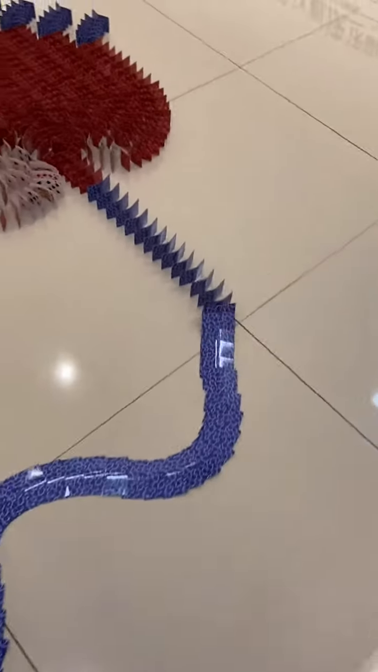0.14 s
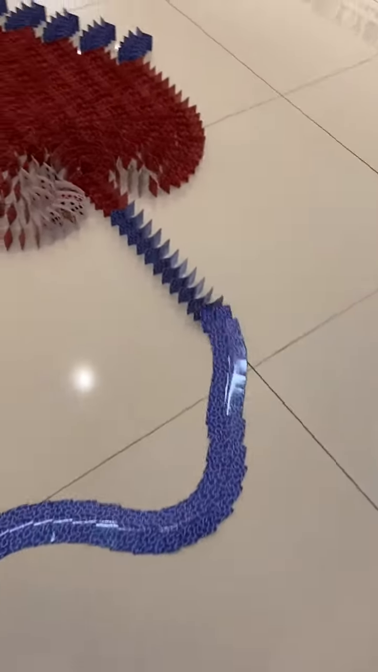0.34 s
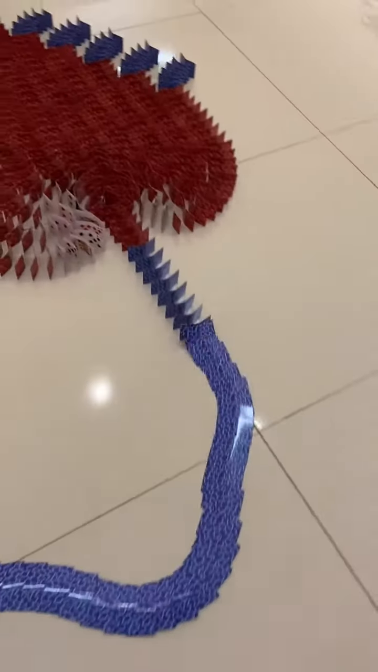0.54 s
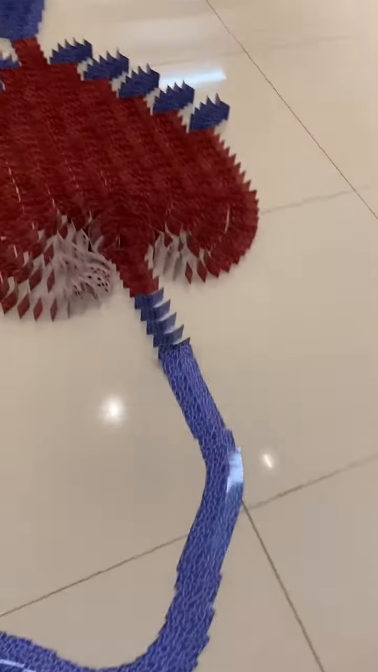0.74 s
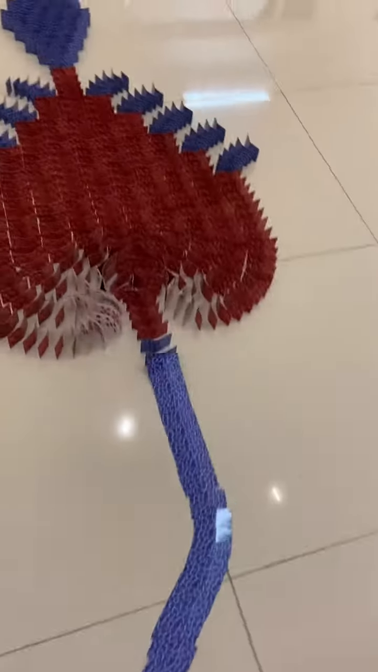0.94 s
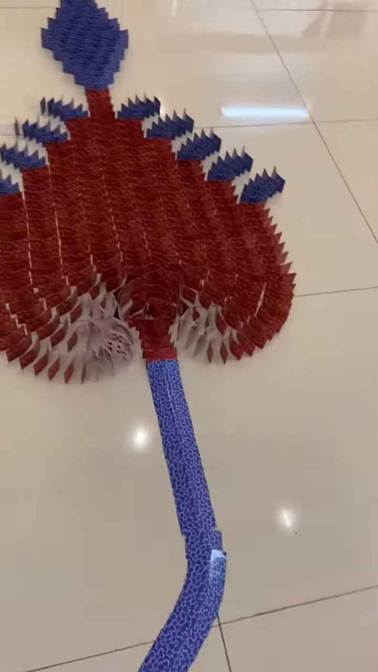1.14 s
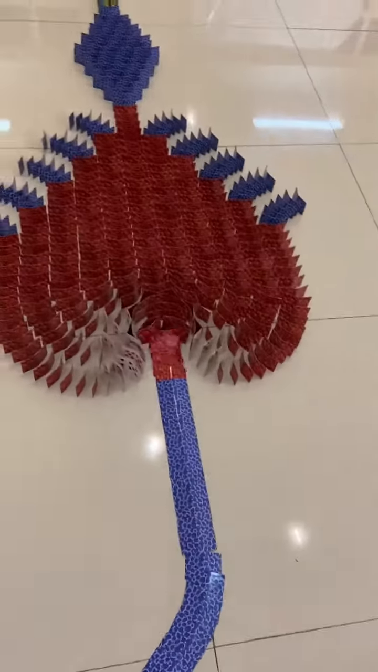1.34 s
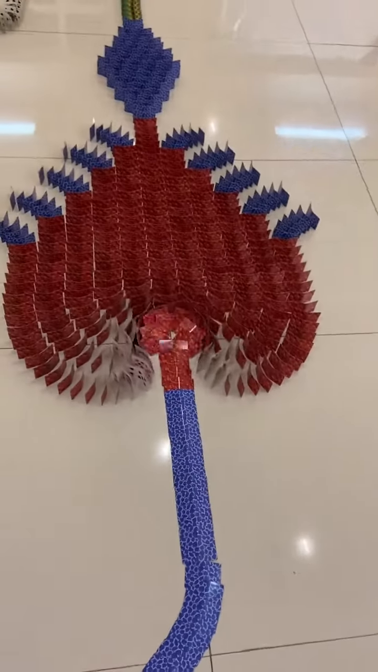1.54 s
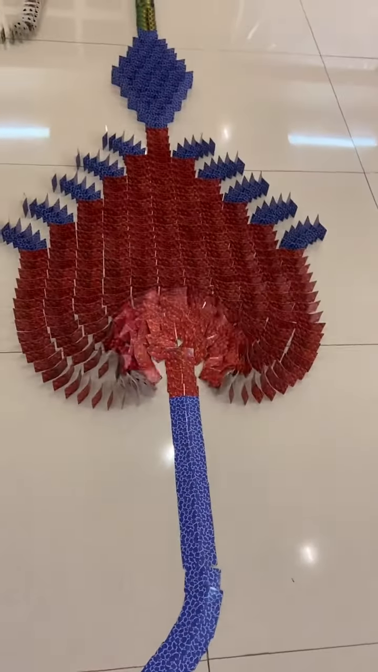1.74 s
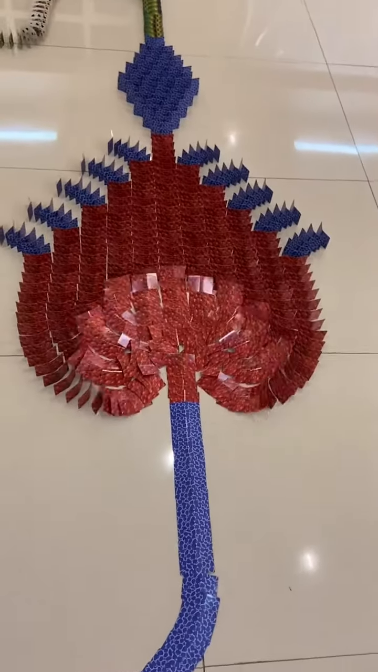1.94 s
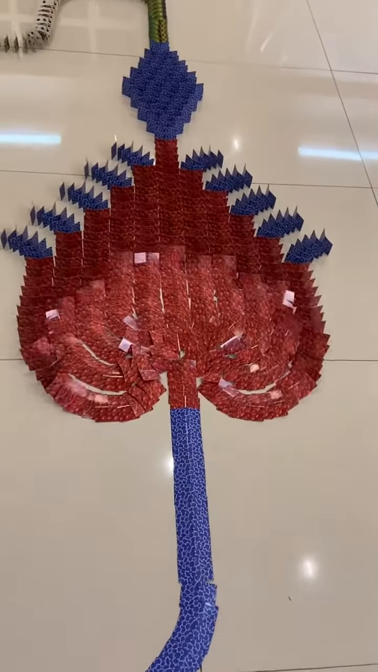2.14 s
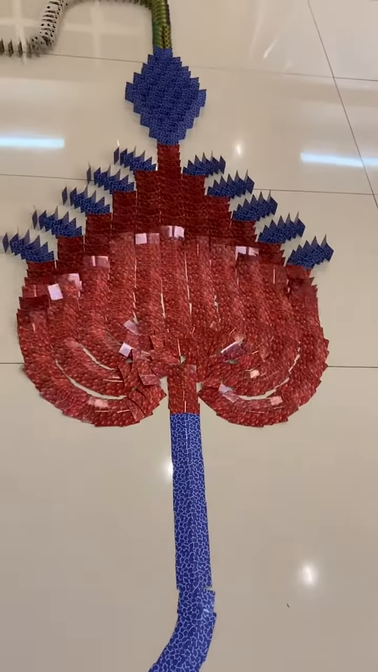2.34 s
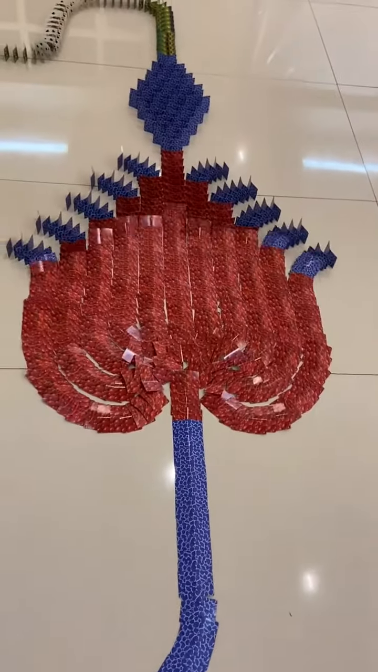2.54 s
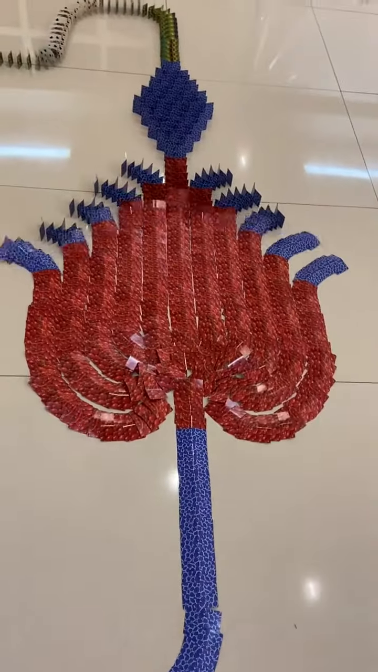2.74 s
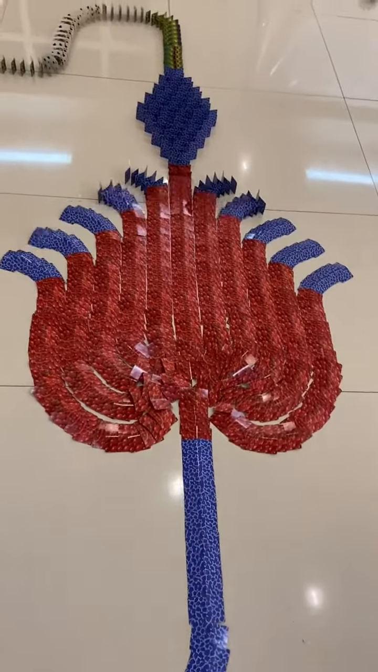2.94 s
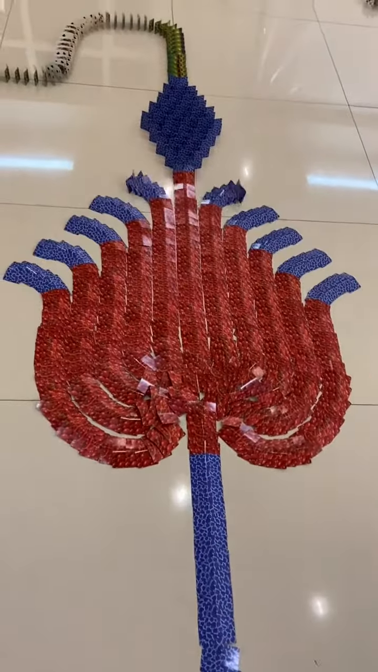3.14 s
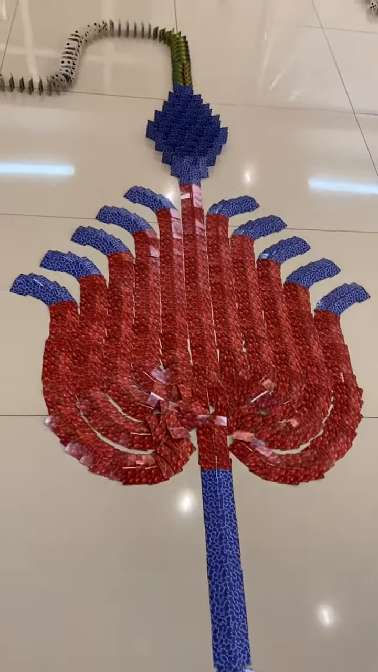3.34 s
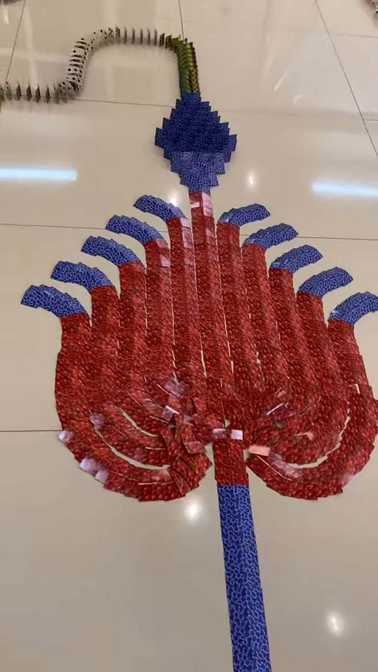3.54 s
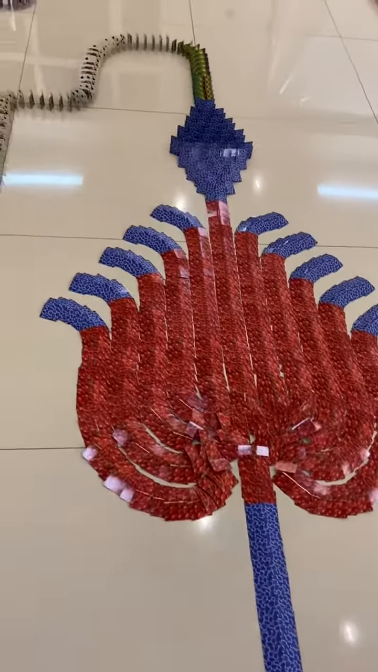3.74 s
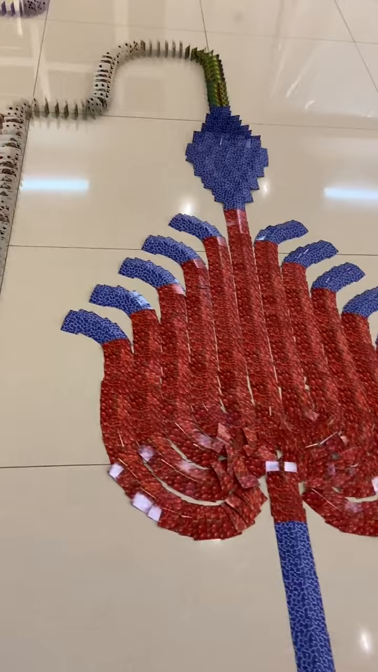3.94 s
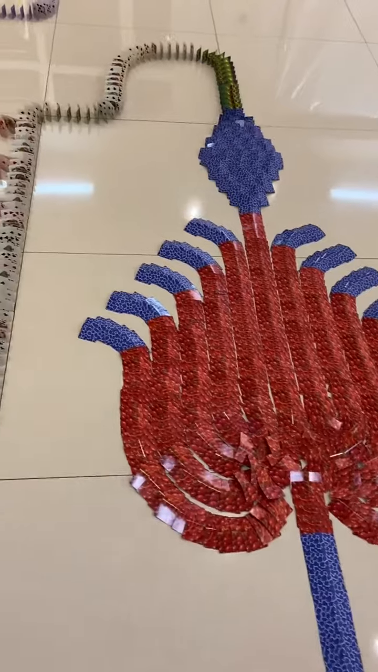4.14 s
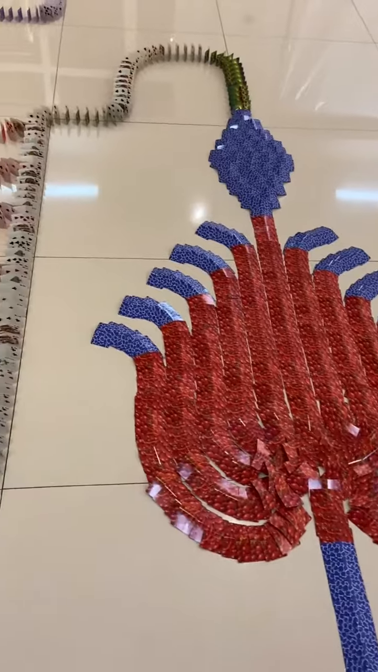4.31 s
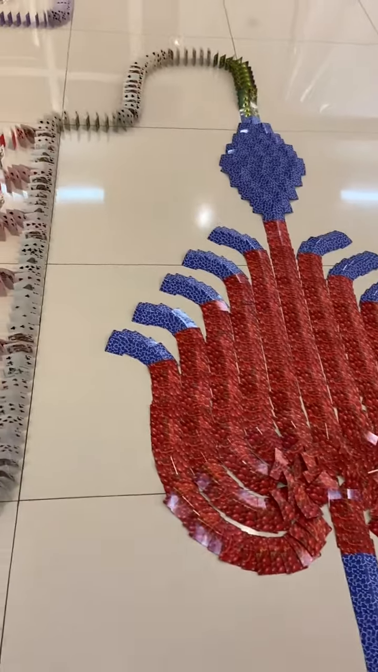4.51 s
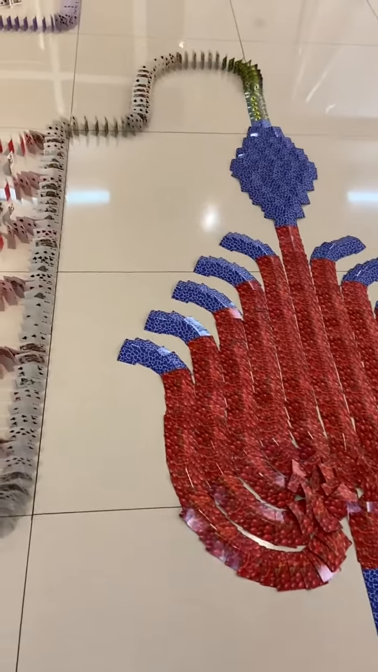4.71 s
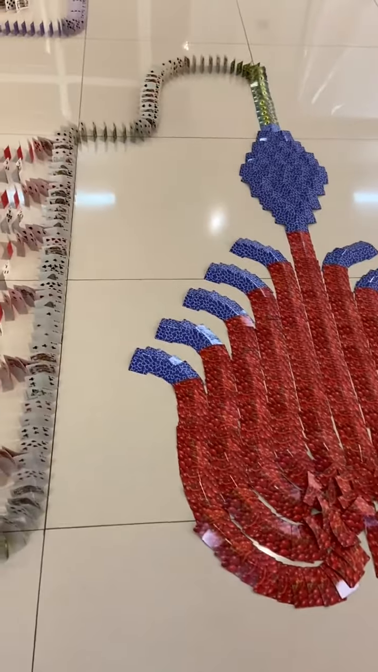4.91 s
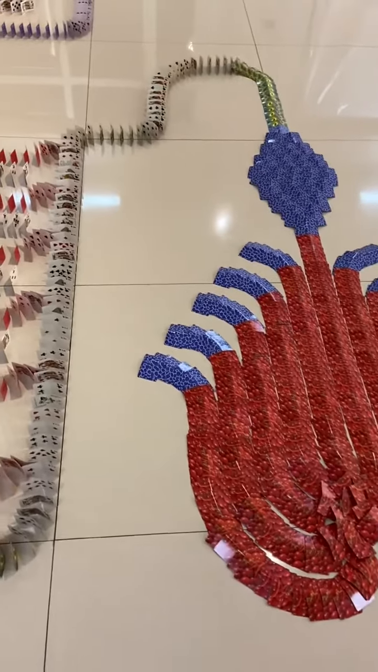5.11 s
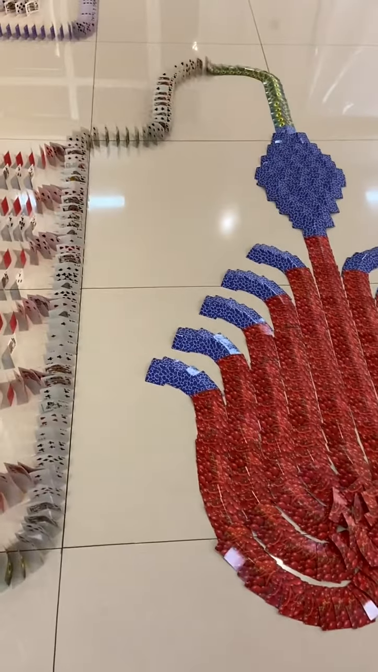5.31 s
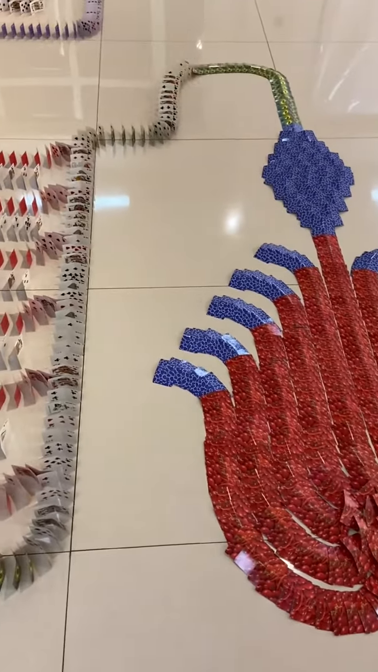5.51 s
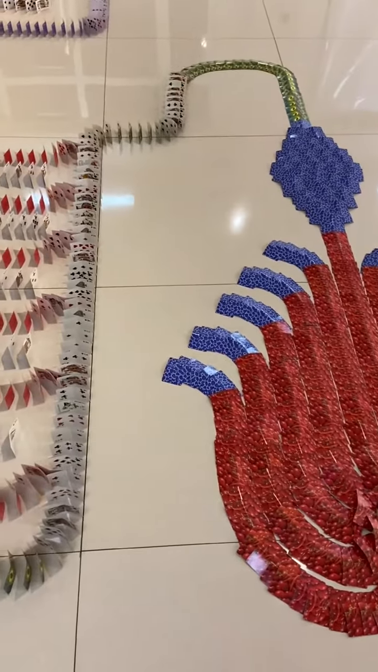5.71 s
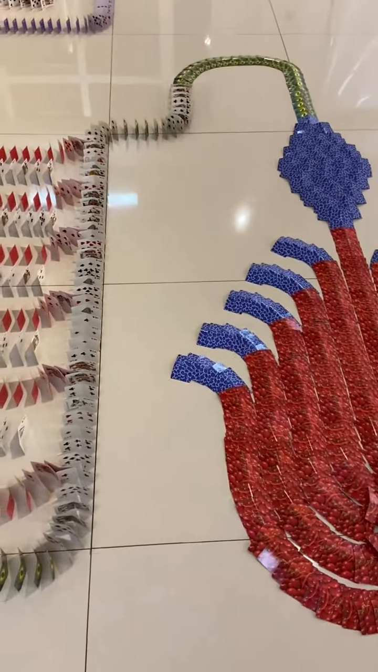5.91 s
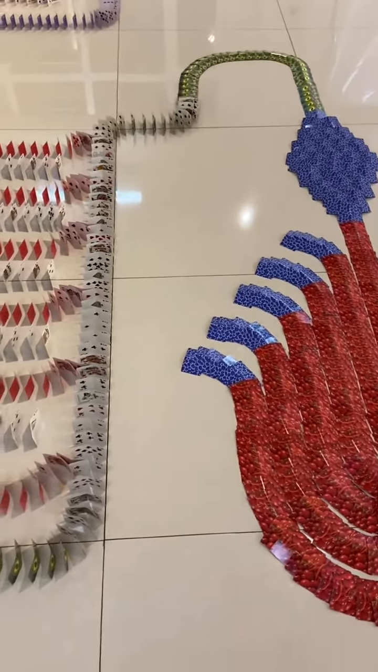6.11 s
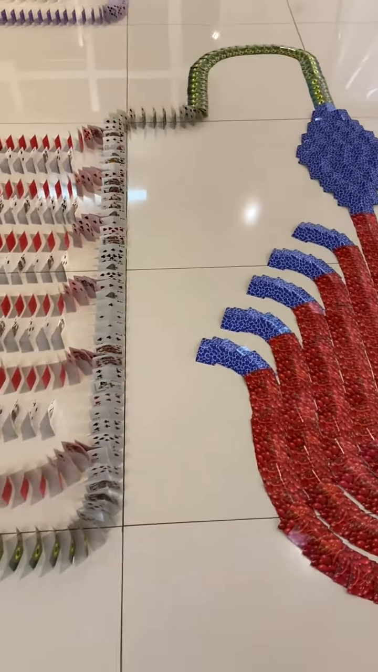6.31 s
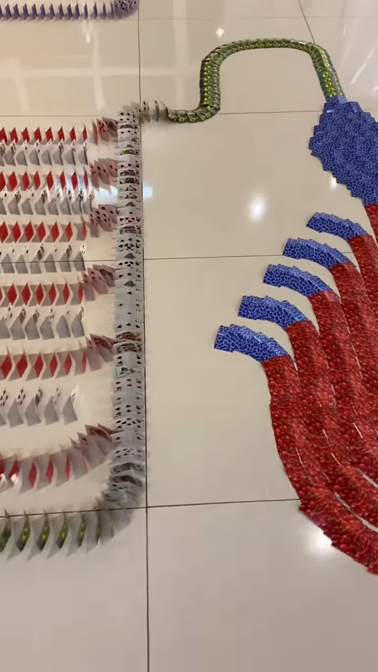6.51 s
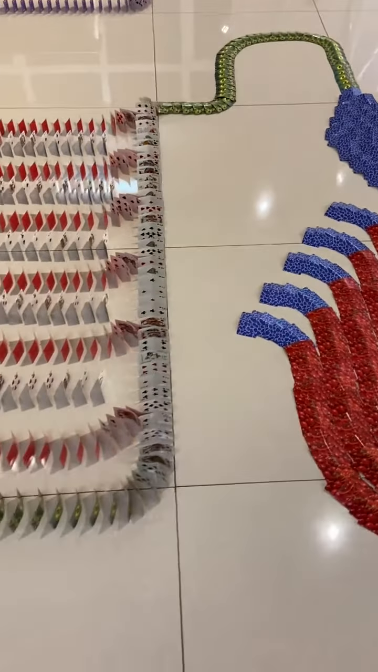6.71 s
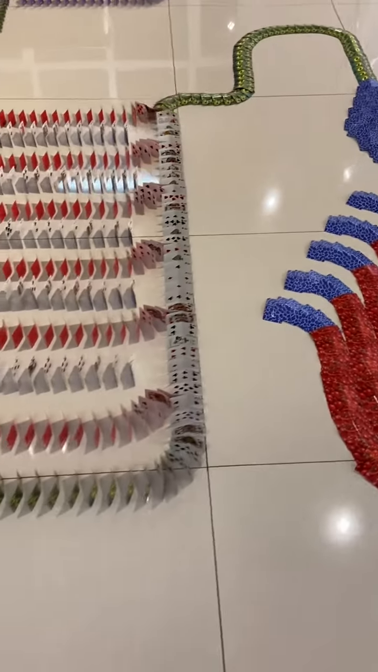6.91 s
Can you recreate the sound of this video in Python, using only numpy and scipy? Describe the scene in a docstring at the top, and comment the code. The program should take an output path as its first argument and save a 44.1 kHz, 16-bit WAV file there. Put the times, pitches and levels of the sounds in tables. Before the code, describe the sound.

Rapid dry card slaps tick along one after another, merge into a wide surging rush of clicks and sliding rustle, then drop off before four seconds. A narrow file starts with a sharp, higher ringing clack and runs into the distance, ending in faint patter and soft low thuds. Stereo pickup in a hard-floored hall with short reflections and airy ventilation.

```python
"""Folded playing cards topple like dominoes across the tiled floor of a large hall, heard in mid-side stereo.
A single file clacks over, fans out into a broad dense clatter, then narrows and runs off into the distance.
Slaps are noise bursts through card resonances; the mass of cards is random clicks and rubbing noise, filtered.
A narrow file rings higher on its own resonances; soft thuds lie under the distant cards.
Floor and walls return a short echo, over the low rumble and airy rush of the ventilation."""
import sys
import numpy as np
from scipy import signal
from scipy.fft import rfft, irfft, next_fast_len
from scipy.io import wavfile
from scipy.ndimage import uniform_filter1d

SR = 44100
rng = np.random.default_rng(int(sys.argv[2]) if len(sys.argv) > 2 else 0)


def generate_wav(signal):
    """Clip the signal to [-1, 1] and save it as 16-bit WAV at the path in sys.argv[1]."""
    frames = np.transpose(np.atleast_2d(signal))
    scaled = np.clip(frames, -1, 1) * 32767
    pcm = np.round(scaled).astype(np.int16)
    wavfile.write(sys.argv[1], SR, pcm)


N = 311346
TIME = np.arange(N) / SR

# loudest slaps of the leading cards, levels before the offsets in slaps():
# start_s, spread_ms (of the landing), low_ring_db, main_ring_db, ring_hz, tick_db
SLAPS = [(0.0595, 2.2, -26, -24.5, 2400, -50), (0.1251, 1.1, -22.5, -21.5, 2310, -29.5),
         (0.1962, 3, -23.5, -25.5, 2200, -28), (0.2156, 0.76, -36, -45, 2050, -56),
         (0.2374, 2.6, -41, -26, 2090, -50.0), (0.2541, 2.1, -26.5, -26.5, 2210, -36),
         (0.3601, 3.1, -30, -32, 2050, -58.5), (0.4137, 2.9, -35, -37, 2120, -65),
         (0.475, 4.2, -32.5, -31.5, 2100, -59), (0.5126, 1.8, -38, -36, 2200, -34),
         (0.6822, 1.7, -43.5, -38, 2200, -49), (0.8178, 3.7, -35, -29.5, 2140, -40),
         (0.8889, 5.1, -27, -31, 2360, -33), (0.9561, 2.5, -34.5, -29, 2260, -42.5),
         (1.026, 4.3, -33.5, -37, 2050, -57), (1.096, 1.5, -21.5, -19.5, 2060, -37),
         (1.1137, 4.3, -45, -32, 2130, -61), (1.1661, 3.0, -24, -26.5, 2280, -32.5),
         (1.1808, 4, -33.0, -30, 2050, -39), (1.2347, 1.2, -30.5, -30, 2380, -38),
         (1.2881, 4.3, -29, -40.0, 2060, -31), (1.3344, 2.7, -28.5, -28, 2070, -34),
         (1.3881, 2.8, -26.5, -28.5, 2360, -28), (1.4334, 2, -30, -32, 2000, -41),
         (1.4577, 2.8, -41, -32, 2080, -55), (1.6273, 3.3, -43.0, -32, 2030, -50),
         (1.7845, 2.3, -26.5, -21.5, 2100, -30.5), (1.8403, 1.5, -22.5, -16, 2620, -21.5),
         (1.8965, 3.1, -23, -24.5, 2400, -34), (1.9596, 1.6, -26.0, -21, 2070, -36),
         (2.0837, 2, -40, -33, 2020, -40), (2.2123, 3.3, -31, -25, 2180, -28),
         (2.2822, 2.7, -26.5, -22.0, 2380, -31), (2.2881, 1.9, -22, -27.5, 2100, -41),
         (2.351, 1.4, -23, -28, 2270, -50), (2.4191, 4.6, -20, -15, 2060, -43.5),
         (2.497, 4.6, -26, -25.0, 2290, -49), (2.5928, 1.7, -22.5, -27, 2450, -31),
         (2.654, 0.7, -21.0, -15.5, 2110, -27.0), (2.7042, 0.8, -26, -32, 2190, -44),
         (2.7167, 0.89, -28, -25, 2510, -41), (2.7827, 1.4, -20.5, -23.5, 2210, -42.0),
         (2.8575, 5.3, -24, -13, 2150, -21.5), (2.9054, 2.3, -29, -13, 2150, -20),
         (2.9366, 1.2, -30.0, -18, 2220, -24), (2.9445, 2.2, -36, -19, 2090, -27.0),
         (2.9585, 0.92, -29, -25.5, 2140, -23), (3.0394, 5.4, -27, -18, 2520, -23),
         (3.1034, 3, -29.5, -28, 2080, -20), (3.1149, 1, -40, -14.5, 2200, -25),
         (3.2233, 3.2, -27, -21, 2590, -21), (3.2305, 3.9, -37, -20.5, 2300, -23),
         (3.276, 1.5, -36, -21, 2160, -42.5), (3.3794, 3.6, -30, -19.5, 2100, -21),
         (3.387, 3.8, -28, -28, 2310, -22), (3.489, 4.4, -52, -29, 2250, -49),
         (3.756, 3.0, -41, -38, 2250, -48.5), (3.8197, 4.5, -42, -38, 2200, -44.0),
         (3.9055, 0.8, -41, -36, 2140, -47), (3.9909, 3.4, -44, -37.5, 2190, -57.5),
         (4.08, 1.5, -56.0, -34, 2180, -63), (4.7834, 1.4, -46, -35.5, 2310, -44.5),
         (4.8422, 2.3, -39, -36.5, 2100, -40), (4.9052, 2, -35, -33, 2100, -43),
         (4.97, 4.6, -33.5, -36.5, 2200, -53), (6.2336, 2.4, -41.0, -40, 2000, -40),
         (6.2966, 2.3, -35, -42.0, 2060, -52), (6.3149, 1.7, -54, -52.0, 2460, -54),
         (6.3515, 1.6, -38.0, -43, 2190, -58), (6.415, 2.5, -36.5, -48, 2510, -47.5),
         (6.795, 3.7, -42, -40.5, 2160, -54)]
# how much is falling, as the level of the mass of cards: start_s, level_db
FALL = [(0, -43), (.17, -42), (.25, -36.5), (.4, -40.5), (.71, -43), (1.05, -42.5), (1.2, -36.5),
        (1.42, -35), (1.55, -41.5), (1.8, -37.5), (2.0, -28), (2.25, -27.5), (2.5, -23.5), (3.05, -24.5),
        (3.42, -27.5), (3.65, -38.5), (4.35, -43), (4.58, -35), (4.95, -37), (5.15, -41), (6.18, -43),
        (6.33, -37), (6.5, -39), (7.06, -44)]
# air puffs as the falling front travels: start_s, lowest_hz, gain_db
FRONT = [(0, 325, 2.5), (.8, 550, 4), (1.25, 287, 3), (2.4, 287, 0.5), (2.8, 390, 0.5), (3.1, 577, -1.5),
         (3.4, 660, -8), (3.55, 700, -7.5), (4.2, 680, 0), (4.7, 340, 0), (5.25, 950, 0), (5.6, 317, 2.5),
         (6.35, 300, 3), (6.55, 215, 2.1), (7.06, 290, 5)]
# level of the treble of the mass of cards: start_s, gain_db
TREBLE = [(0, 0), (1.0, 0), (1.4, 1), (2.2, 2), (3.0, 2.5), (3.7, 0), (4.3, 1), (4.9, 0), (5.6, 0),
          (6.35, 0.5), (7.06, 0.5)]
# colour of the many small contacts: pitch_hz, gain_db
CONTACT_COLOUR = [(150, -7), (400, -10), (700, -10.5), (1050, -7), (1650, -1.5), (2170, 9), (2480, 1.5),
                  (2800, -13.5), (3550, -7), (4500, -15.5), (8400, -9.5), (10000, -19), (15500, -35)]
# colour of a card edge striking: pitch_hz, gain_db
EDGE_COLOUR = [(1800, -13.5), (3000, 10), (5300, 4), (6500, 8), (8700, 7), (11500, -11), (15500, -13)]
# colour of the air squeezed from under a card: pitch_hz, gain_db
PUFF_COLOUR = [(100, -21.5), (330, -13.5), (520, -2.5), (720, 7), (880, -6.5), (1100, 10), (1400, -19),
               (2500, -44.5)]
# lower resonances of a slapped card: pitch_hz, width_hz, gain_db
LOW_MODES = [(1370, 210, -3), (1713, 570, -6.5)]
# main resonances of a slapped card: multiple (of its ring pitch), width_hz, gain_db
MAIN_MODES = [(1, 230, 1.5), (1.12, 260, -4.5), (1.33, 200, -10.5)]
# pitches at which the card edges ping: pitch_hz, gain_db
EDGE_PINGS = [(2670, -0.5), (2880, -29), (2955, -1), (3190, -3.5), (3347, -4.5), (3520, -3), (3720, -4),
              (3950, -4.5), (4204, -6), (4360, -4), (4490, -27), (4778, -10), (5164, -1.5), (5337, -9),
              (5512, -5), (5879, -21.5)]
# moving treble resonance of the sliding cards, level before the offset in sheen(): start_s, pitch_hz, level_db
SHEEN = [(0, 5600, -58), (1.4, 5390, -50.5), (1.7, 5350, -49), (2.3, 5160, -35), (2.7, 4900, -43),
         (2.92, 4400, -28.5), (3.1, 4150, -34.5), (3.4, 4400, -32), (3.65, 4500, -51), (4.3, 4360, -53),
         (5.1, 5650, -45.5), (6.3, 5520, -51), (7.06, 5660, -45.5)]
# random swing of narrow ranges of pitch in the clatter, wider in the treble: pitch_hz, swing_db
SWING = [(600, 3), (1500, 1), (3000, 5), (6000, 6), (12000, 8)]
# hollow resonance of the air under the cards: pitch_hz, width_hz, gain_db
HOLLOW_MODES = [(723, 120, 0)]
# resonances of the narrow file as it starts; each is applied twice: pitch_hz, width_hz, gain_db
FILE_MODES = [(1180, 160, -10.5), (1630, 300, -3.5), (2400, 200, 3), (2590, 200, -2), (2840, 93, -9),
              (3800, 900, -22), (4900, 230, -6.5), (5150, 220, -10)]
# cards of the narrow file slapping down: start_s, spread_ms (of the landing), level_db
FILE_SLAPS = [(4.3786, 1.6, -17.5), (4.4164, 5, -36), (4.4312, 4, -26), (4.4846, 5, -23.5),
              (4.5385, 5, -25.5), (4.5936, 5, -27), (4.654, 4, -30)]
# soft low thuds under the distant cards: start_s, pitch_hz, peak_db (of the envelope)
THUDS = [(6.48, 202, -35.5), (6.542, 212, -32), (6.60, 101, -40), (6.631, 67, -34)]
# background colour of the hall: pitch_hz, gain_db
HALL_COLOUR = [(20, -22), (40, -23), (52, -10), (63, -0.5), (80, -9), (125, -15.5), (200, -15.5),
               (400, -19), (800, -30.5), (2000, -34), (4000, -46), (15000, -50)]
# rumble of the hall, before the offset in hall_noise(): start_s, level_db
RUMBLE = [(0.0, -45.5), (2.16, -47), (2.52, -58), (3.9, -52.5), (5.41, -57), (6.76, -47), (7.06, -52)]
# filter on the side signal, the width of the sound field: pitch_hz, gain_db
WIDTH = [(50, -18.5), (130, -8.5), (400, -8), (800, -5.5), (1300, -10), (1850, -14), (2300, -5.5),
         (3000, 2.5), (4500, -4.5), (5600, -2), (7300, -3.5), (10500, -6), (13500, 8), (15500, -19)]
# filter on the mid signal; the centre thins out in two treble bands: pitch_hz, gain_db
CENTRE = [(6100, -2.5), (6900, -37.5), (7800, -39.5), (8500, -11), (12200, 4.5), (13100, -35), (14200, -6),
          (14900, -4.5)]
# the level dips briefly: start_s, gain_db
DIP = [(.83, -1.5), (.85, -19), (.862, -34), (.868, 0)]

LEAD = 1024  # samples of brushing before a card strikes
BRUSH, BRUSH_S = .16, .004  # brushing a neighbour: share of the force, rise time (s)
# the two halves of a folded card: typical lag (s), opposing share of the force in the second
FOLD_LAG_S, FOLD_SHARE = 0.001483, 0.41
RING_HZ = 2200  # pitch of a typical card's ring in the patter
PUFF_DB = -6  # a slap's puff of air, relative to its low ring as listed (dB)
# a single file falls at this level with this many contacts; more cards add contacts (doublings per dB)
SINGLE_DB, CONTACTS_PER_S, CONTACTS_PER_DB = -40, 900, 0.14
# narrow file: start (s), level before its surges (dB), fade (dB/s)
FILE_START_S, FILE_DB, FILE_FADE_DB_PER_S = 4.379, -29, 23
FILE_RISE_PER_S = 0.067  # pitch rise of the narrow file during its first second (share per s)
CUTOFF_HZ = 15900


def slaps(low_db=0.0, main_db=1.0, edge_db=4.0, side_db=-6.5, size=4096):
    """Each slap sounds the low and main rings of the cards, ticks at their edges and pushes out a puff of air."""
    out = np.zeros((2, N + size))
    t = (np.arange(size) - LEAD) / SR
    for s, spread_ms, low, main, ring_hz, tick in list(SLAPS) + patter():
        push = both_halves(landing(t, spread_ms), scatter=0.063)
        main_modes = [(k * ring_hz, width, db) for k, width, db in MAIN_MODES]
        low_ring = cut(resonate(push, LOW_MODES), [900, 2100], "band")
        main_ring = cut(resonate(push, main_modes), [1800, 3500], "band")
        parts = [(low_ring, low + low_db),
                 (main_ring, main + main_db),
                 (colour(push, EDGE_COLOUR), tick + edge_db),
                 (colour(push, PUFF_COLOUR), low + PUFF_DB)]
        i = round(s * SR)
        out[:, i:i + size] += sum(at_peak(part, db, size=441) for part, db in parts)
    return out[:, LEAD:LEAD + N] * from_db([[0], [side_db]])


def patter(step_s=.068, jitter=.15, ring_db=-56.0, follows=1.0, spread_db=4.0,
           tick_below_db=-9.0, spread_ms=3.2, octaves=0.11, count=130):
    """Lesser cards fall at a fairly even pace, louder with the swell: rows like those of SLAPS."""
    pace, force, pitch = np.clip(rng.standard_normal((count, 3)), -2, 2).T
    times = np.cumsum(step_s * np.exp(jitter * pace))
    levels = ring_db + follows * np.interp(times, TIME, swell_db()) + spread_db * force
    rows = zip(times, levels, RING_HZ * 2 ** (octaves * pitch))
    return [(s, spread_ms, db, db, hz, db + tick_below_db) for s, db, hz in rows if s < TIME[-1]]


def landing(t, spread_ms, first=4.1, settle=0.3, settle_s=0.013):
    """Cards abreast brush neighbours, land within milliseconds from t = 0 and slide to rest: (mid, side)."""
    grains = rng.standard_normal((2, len(t))) * np.sqrt(rng.exponential(1, len(t)))
    brushing = BRUSH * np.exp(-abs(t) / BRUSH_S)
    impact = np.exp(-(t * 1000 / spread_ms) ** 2)
    sliding = settle * np.exp(-abs(t) / settle_s)
    push = grains * np.where(t < 0, brushing, impact + sliding)
    push[0, LEAD] += first  # the first touch, in the centre
    return push


def both_halves(pair, scatter=0.13):
    """The second half of a folded card lands just after the first, giving the clack its hollow colour."""
    lag = max(1, round(FOLD_LAG_S * np.exp(scatter * rng.standard_normal()) * SR))
    second = np.pad(pair, [(0, 0), (lag, 0)])[:, :-lag]
    return pair - FOLD_SHARE * second


def rattle(per_s=50, above_db=0.5, spread_db=-0.5, centre_hz=2150, octaves=0.2, tick_below_db=-12.0, size=2560):
    """Lesser slaps at random moments stand just out of the mass, each with its own pitch and a small tick."""
    rings, ticks = np.zeros((2, 2, N + size))
    t = (np.arange(size) - LEAD) / SR
    slap_db = in_time(FALL)[0] + above_db
    starts = np.flatnonzero(rng.random(N) < per_s / SR)
    chances = np.clip(rng.standard_normal((len(starts), 2)), -2, 2)
    for i, (force, pitch) in zip(starts, chances):
        peak_db = slap_db[i] + spread_db * force
        modes = card_modes(centre_hz * 2 ** (octaves * pitch))
        ring = resonate(landing(t, spread_ms=1.74), modes)
        tick = rng.standard_normal((2, size)) * np.exp(-abs(t) / 0.0023)
        rings[:, i:i + size] += at_peak(both_halves(ring), peak_db)
        ticks[:, i:i + size] += at_peak(tick, peak_db + tick_below_db)
    mixed = cut(rings, [950, 3400], "band") + cut(ticks, [3000, 7000], "band")
    return mixed[:, LEAD:LEAD + N]


def card_modes(ring_hz, uneven_db=3.0):
    """The resonances of a card that rings at this pitch; each landing excites them differently."""
    modes = list(LOW_MODES) + [(k * ring_hz, width, db) for k, width, db in MAIN_MODES]
    return [(hz, width, db + uneven_db * rng.standard_normal()) for hz, width, db in modes]


def clatter(ring_db=-42.5, ring_follows=1.086, tick_db=-44.5, tick_follows=0.81,
            puff_db=-40.5, puff_follows=0.81, uneven_db=2.0):
    """Countless contacts follow the swell: air puffs below, card rings in the middle, edge ticks above."""
    swell = swell_db()
    edge_hz, front_db = in_time(FRONT)
    per_s = CONTACTS_PER_S * 2 ** (CONTACTS_PER_DB * swell)
    cards = colour(contacts(per_s, spread_db=1.0, rub=1.0), CONTACT_COLOUR)
    rings = unit(cut(cards, [1250, 3200], "band", order=4))
    ticks = unit(cut(cards, 4400, "high", order=4))
    ticks = ticks * treble_gain() * from_db(uneven_db * waver(rate_hz=5.5))
    air = colour(contacts(per_s, spread_db=0.0, rub=0.57), CONTACT_COLOUR)
    air = cut(air, 1366, "low", order=4)
    puffs = unit(moving_highpass(air, edge_hz)) * from_db(front_db)
    return (rings * from_db(ring_db + ring_follows * swell)
            + ticks * from_db(tick_db + tick_follows * swell)
            + puffs * from_db(puff_db + puff_follows * swell))


def contacts(per_s, spread_db, rub):
    """Random clicks of uneven size and direction over the noisy rub of sliding faces: (mid, side)."""
    sizes = from_db(spread_db * np.minimum(rng.exponential(1, N), 4))
    clicks = (rng.random(N) < per_s / SR) * sizes / np.sqrt(per_s)
    clicks = unit(clicks * rng.choice([-1, 1], (2, N)))
    return unit(clicks + rub * rng.standard_normal((2, N)))


def edge_rings(per_s=750, spread_db=-0.5, width_hz=45, level_db=-44.5, follows=0.7):
    """Card edges ping briefly, each at one of many high pitches; their level follows the swell."""
    at = np.flatnonzero(rng.random(N) < per_s / SR)
    sizes = from_db(spread_db * np.minimum(rng.exponential(1, len(at)), 4))
    sizes = sizes * rng.choice([-1, 1], (2, len(at)))
    dealt = rng.integers(0, len(EDGE_PINGS), len(at))  # which pitch each contact excites
    out = 0
    for k, (hz, db) in enumerate(EDGE_PINGS):
        clicks = np.zeros((2, N))
        clicks[:, at[dealt == k]] = sizes[:, dealt == k]
        out = out + resonate(clicks, [(hz, width_hz, db)])
    return unit(out) * treble_gain() * from_db(level_db + follows * swell_db())


def sheen(width_hz=520, level_db=-4.5):
    """Sliding cards sing through a doubled treble resonance that sinks until about 3 s and later climbs."""
    hz, db = in_time(SHEEN)
    push = contacts(900, spread_db=0.0, rub=0.13)
    singing = gliding(gliding(push, hz, width_hz), hz, width_hz)
    return unit(singing) * from_db(db + level_db)


def swinging(pair, span_hz=170, hold_s=0.091, size=2048):
    """Narrow ranges of pitch flare and fade at random; each keeps a mean squared gain of 1."""
    hz, _, frames = signal.stft(pair, SR, nperseg=size)
    chance = rng.standard_normal(frames.shape)
    # smooth the chance over neighbouring pitches, then over time
    for axis, steps in ((1, span_hz * size / SR), (2, 2 * hold_s * SR / size)):
        chance = signal.sosfilt(signal.butter(2, 1 / max(steps, 2), output="sos"), chance, axis=axis)
    swing_db = np.interp(hz, *np.transpose(SWING))[:, None]
    gain = from_db(swing_db * np.clip(chance / chance.std(), -3, 1.5))
    gain /= np.sqrt(np.mean(gain ** 2, axis=2, keepdims=True))
    return signal.istft(frames * gain, SR, nperseg=size)[1][:, :N]


def hollow(level_db=-53.5, follows=0.82):
    """The trapped air rings low and gives the falling mass its weight."""
    push = contacts(600, spread_db=2.0, rub=.5)
    ringing = cut(resonate(push, HOLLOW_MODES), [450, 1100], "band")
    return unit(ringing) * from_db(level_db + follows * swell_db())


def swell_db():
    """How far the mass of falling cards stands above a single file, at every sample."""
    return in_time(FALL)[0] - SINGLE_DB


def treble_gain():
    """How strongly the card edges sound, at every sample."""
    return from_db(in_time(TREBLE)[0])


def narrow_file(side_db=4.5, surge=0.7, surge_s=0.022, attack_s=0.004):
    """Evenly stacked cards all ring alike as the narrow file runs down, surging with every slap."""
    age = TIME - FILE_START_S
    fade = from_db(FILE_DB - FILE_FADE_DB_PER_S * np.maximum(age, 0))
    level = np.clip(1 + age / attack_s, 0, 1) * fade
    kicks = np.zeros(N)
    kicks[[round(s * SR) for s, _, _ in FILE_SLAPS]] = surge
    drive = 1 + signal.lfilter([1], [1, -np.exp(-1 / (surge_s * SR))], kicks + 1e-18)
    push = contacts(900, spread_db=-3.0, rub=1.0)
    rise = 1 + FILE_RISE_PER_S * np.clip(age, 0, 1)
    modes = 0
    for hz, width, db in FILE_MODES:
        once = gliding(push, hz * rise, width)
        modes = modes + from_db(db) * gliding(once, hz * rise, width)
    ringing = cut(modes, [1200, 6000], "band")
    return unit(ringing) * drive * level * from_db([[0], [side_db]])


def file_slaps(tick_below_db=-26.0, size=4096):
    """Cards of the narrow file share its resonances and hardly tick."""
    out = np.zeros((2, N + size))
    t = (np.arange(size) - LEAD) / SR
    for s, spread_ms, db in FILE_SLAPS:
        push = landing(t, spread_ms)
        rise = 1 + FILE_RISE_PER_S * (s - FILE_START_S)
        ring = 0
        for hz, width, gain_db in FILE_MODES:
            once = resonate(push, [(hz * rise, width, gain_db)])
            ring = ring + resonate(once, [(hz * rise, width, 0)])
        tick = colour(push, EDGE_COLOUR)
        i = round(s * SR)
        out[:, i:i + size] += at_peak(ring, db, size=441) + at_peak(tick, db + tick_below_db, size=441)
    return out[:, LEAD:LEAD + N]


def low_thuds(rise_cycles=1.25, side=0.17):
    """Each soft thud is a low sine that swells and dies within a few cycles."""
    out = np.zeros(N)
    for s, hz, db in THUDS:
        cycles = np.maximum(TIME - s, 0) * hz
        envelope = cycles / rise_cycles * np.exp(1 - cycles / rise_cycles)
        out += from_db(db) * envelope * np.sin(2 * np.pi * cycles)
    return np.array([out, side * out])


def hall_echo(pair, t60_s, wet_db, dull_hz):
    """The hard floor and far walls return a diffuse, duller tail: decaying noise convolved with the mid."""
    t = TIME[:SR]
    tail = rng.standard_normal((2, SR)) * from_db(-60 * t / t60_s) * (1 - np.exp(-t / 0.0022))
    tail = cut(tail / np.sqrt(np.sum(tail[0] ** 2)), dull_hz, "low", order=1)
    return from_db(wet_db) * signal.fftconvolve(pair[:1], tail, axes=1)[:, :N]


def hall_noise(rumble_db=5.0, air_db=-43.0):
    """Ventilation: an uneven low rumble under a steady rush of air, both filtered noise."""
    level_db, = in_time(RUMBLE)
    noise = unit(colour(rng.standard_normal((2, N)), HALL_COLOUR))
    rumble = unit(cut(noise, 200, "low", order=3)) * from_db(level_db + rumble_db)
    rush = cut(noise, 316, "high", order=3) * from_db(air_db)
    return rumble + rush


def from_db(db):
    """Decibels to gain."""
    return 10 ** (np.asarray(db) / 20)


def unit(pair):
    """Scale a (mid, side) pair so that its mid has rms 1."""
    return pair / np.sqrt(np.mean(pair[0] ** 2) + 1e-20)


def at_peak(pair, db, size=110):
    """Scale a short sound so that the mid's loudest stretch of `size` samples has the given rms level."""
    return pair * from_db(db) / np.sqrt(uniform_filter1d(pair[0] ** 2, size).max())


def in_time(rows):
    """The columns of a curve at every sample."""
    s, *columns = np.transpose(rows)
    return [np.interp(TIME, s, c) for c in columns]


def waver(rate_hz, size=100):
    """Slow random drift with spread 1, drawn every `size` samples."""
    lowpass = signal.butter(2, rate_hz, fs=SR / size, output="sos")
    slow = signal.sosfilt(lowpass, rng.standard_normal(2 * N // size))
    slow = slow[-(N // size):]  # skip the filter's start
    return np.interp(np.arange(N) / size, np.arange(len(slow)), slow / slow.std())


def colour(x, spectrum):
    """Causal (minimum-phase) filter through pitch_hz, gain_db points, built from a folded cepstrum."""
    size = next_fast_len(x.shape[-1] // 2 + 2048) * 2
    hz, db = np.transpose(spectrum)
    grid = np.maximum(np.arange(size // 2 + 1) * SR / size, 1)
    gain = from_db(np.interp(np.log(grid), np.log(hz), db))
    cepstrum = irfft(np.log(gain))
    cepstrum[1:size // 2] *= 2
    cepstrum[size // 2 + 1:] = 0
    return irfft(rfft(x, size) * np.exp(rfft(cepstrum)))[..., :x.shape[-1]]


def cut(x, hz, kind, order=2):
    """Butterworth filter."""
    return signal.sosfilt(signal.butter(order, hz, kind, fs=SR, output="sos"), x)


def resonate(x, modes):
    """Parallel two-pole resonances (pitch_hz, width_hz, gain_db) with alternating signs."""
    out = 0
    for k, (hz, width, db) in enumerate(modes):
        r = np.exp(-np.pi * width / SR)
        poles = [1, -2 * r * np.cos(2 * np.pi * hz / SR), r * r]
        gain = (-1) ** k * from_db(db) * (1 - r * r) / 2
        out = out + gain * signal.lfilter([1, 0, -1], poles, x + 1e-18)
    return out


def gliding(x, hz, width_hz, size=1024):
    """A two-pole resonance whose pitch moves, block by block."""
    out, state = np.zeros_like(x), np.zeros((2, 2))
    r = np.exp(-np.pi * width_hz / SR)
    for i in range(0, N, size):
        poles = [1, -2 * r * np.cos(2 * np.pi * hz[i] / SR), r * r]
        out[:, i:i + size], state = signal.lfilter([1, 0, -1], poles, x[:, i:i + size], zi=state)
    return out * (1 - r * r) / 2


def moving_highpass(x, edge_hz, size=2048):
    """High-pass whose edge glides, block by block."""
    out, state = np.zeros_like(x), np.zeros((2, 2, 2))
    for i in range(0, N, size):
        sos = signal.butter(4, edge_hz[i], "high", fs=SR, output="sos")
        out[:, i:i + size], state = signal.sosfilt(sos, x[:, i:i + size], zi=state)
    return out


def scene():
    """Cards and hall as a mid and a side signal, turned into left and right."""
    mass = swinging(edge_rings() + sheen() + clatter())
    cards = slaps() + rattle() + file_slaps() + narrow_file() + hollow() + mass
    echo = hall_echo(cards, t60_s=.28, wet_db=-8.5, dull_hz=5600)
    mid, side = cards + echo + hall_noise() + low_thuds()
    mid, side = colour(mid, CENTRE), colour(side, WIDTH)
    return np.array([mid + side, mid - side])


def record(dry):
    """The level dips once, peaks are rounded, the top is cut."""
    dip_db, = in_time(DIP)
    rounded = 1.248 * np.tanh(dry * from_db(dip_db) / 1.313)
    lowpass = signal.ellip(12, .1, 90, CUTOFF_HZ, fs=SR, output="sos")
    return signal.sosfilt(lowpass, rounded)


dry = scene()
out = record(dry)
generate_wav(out)
```